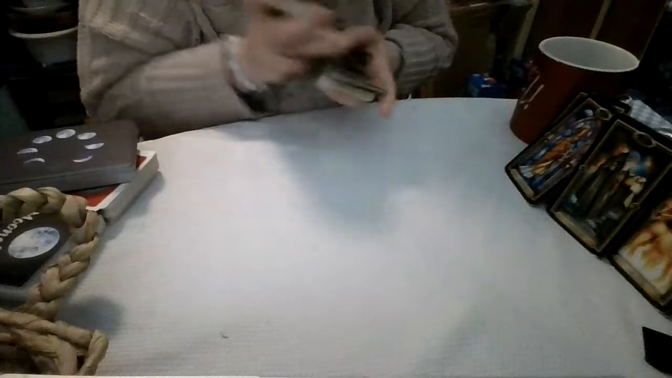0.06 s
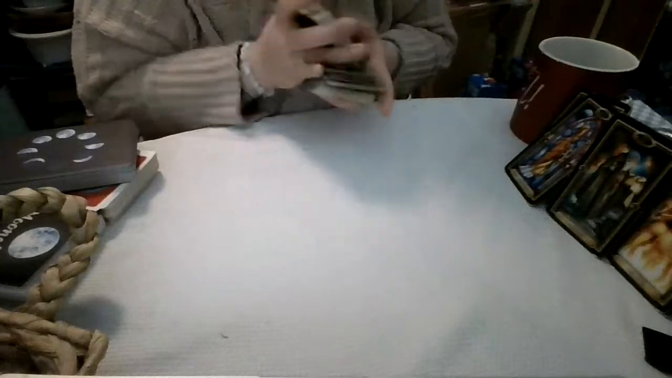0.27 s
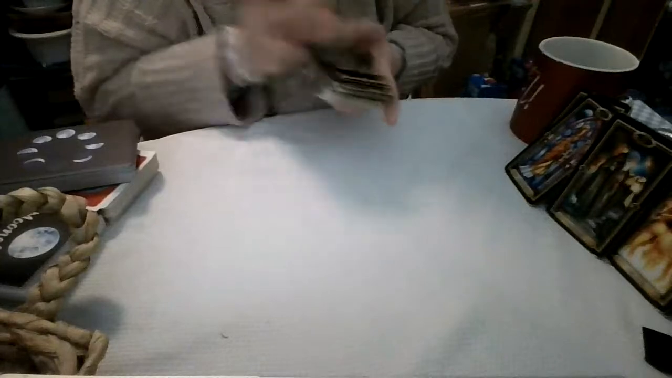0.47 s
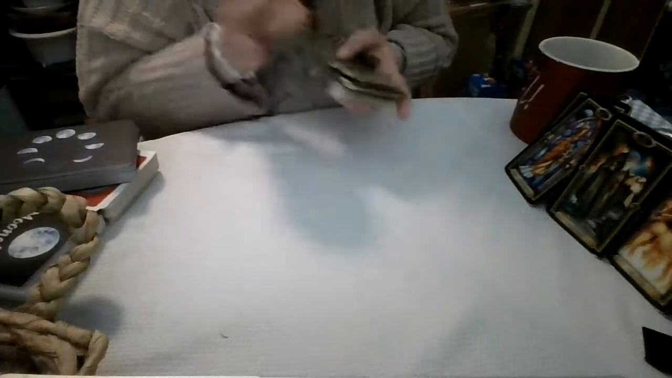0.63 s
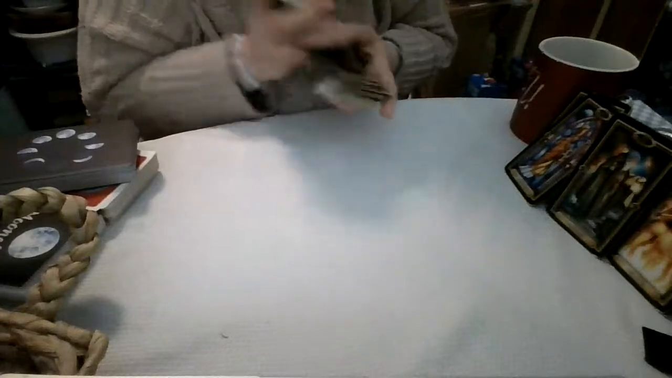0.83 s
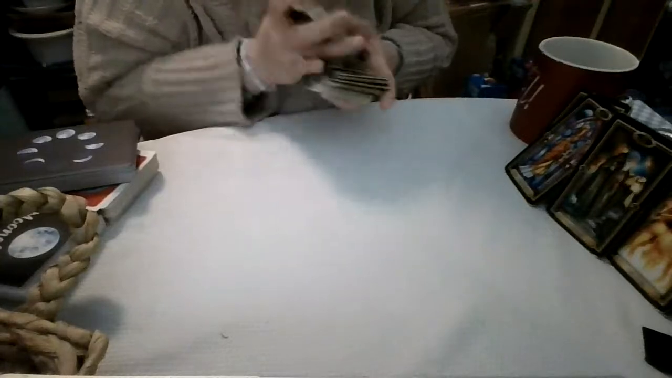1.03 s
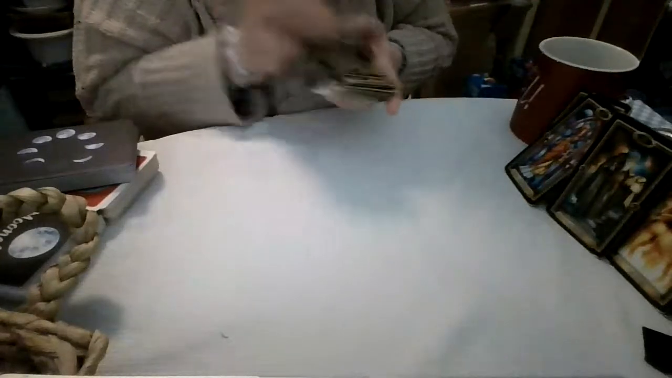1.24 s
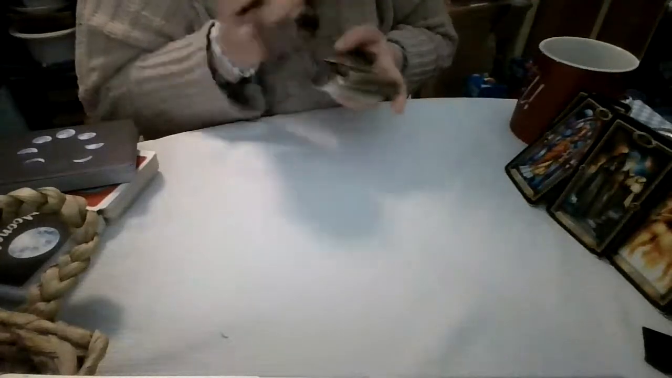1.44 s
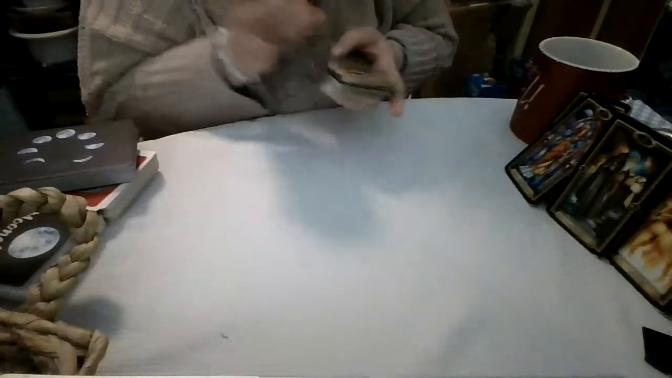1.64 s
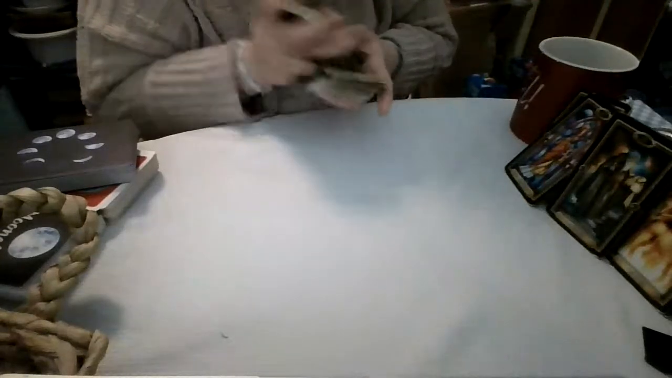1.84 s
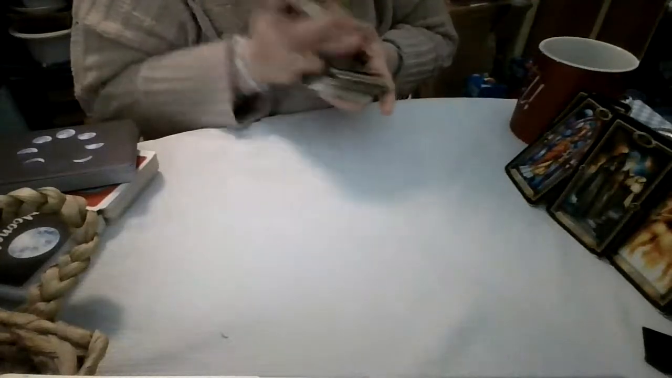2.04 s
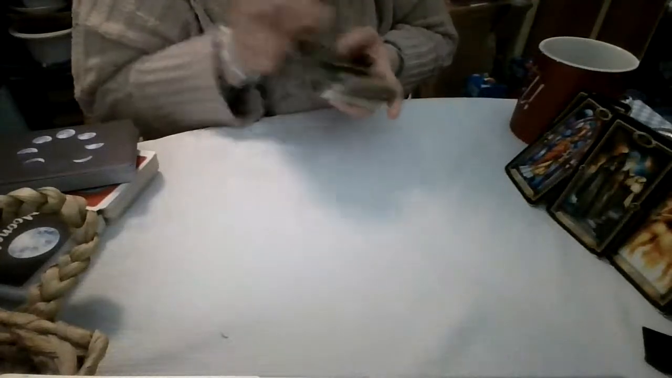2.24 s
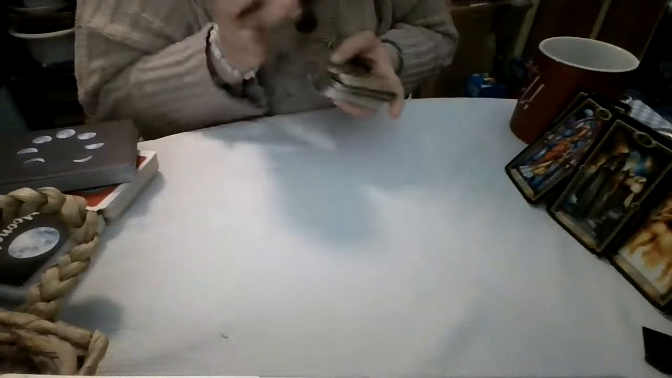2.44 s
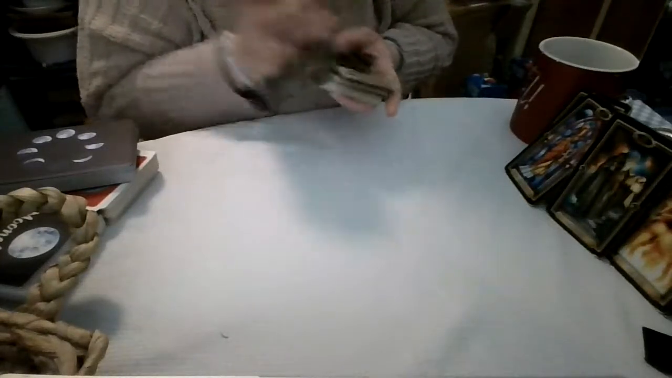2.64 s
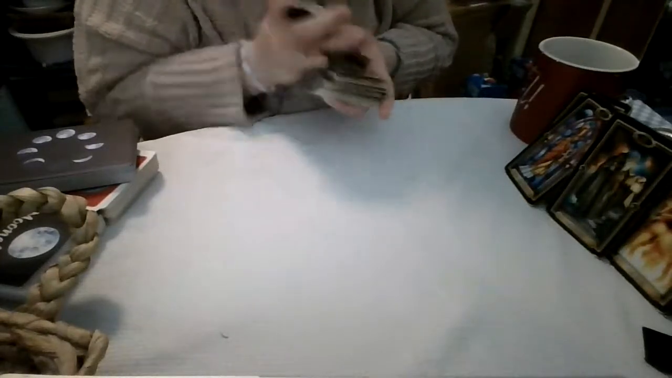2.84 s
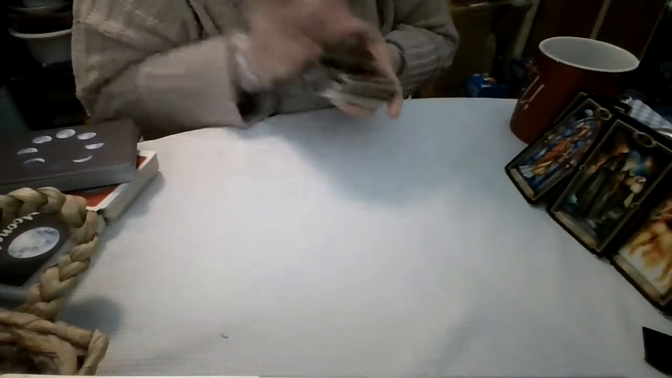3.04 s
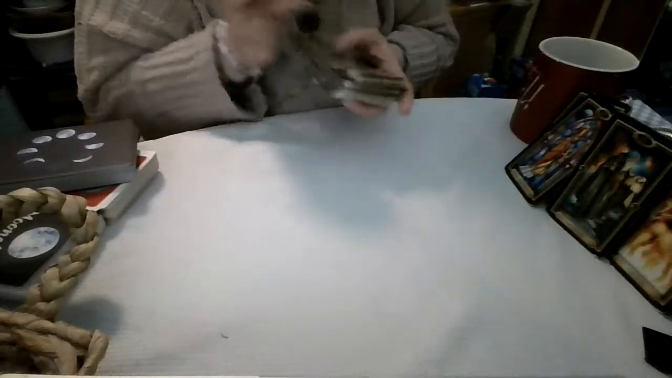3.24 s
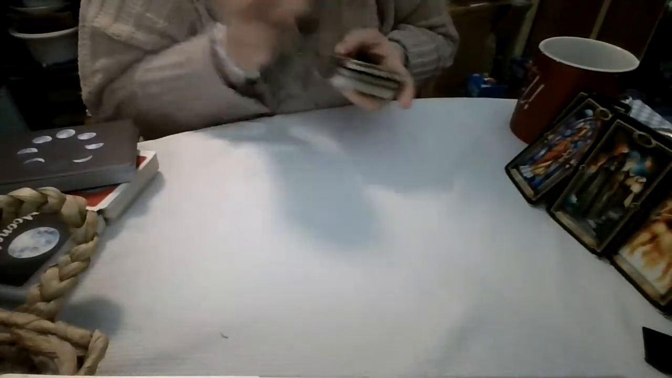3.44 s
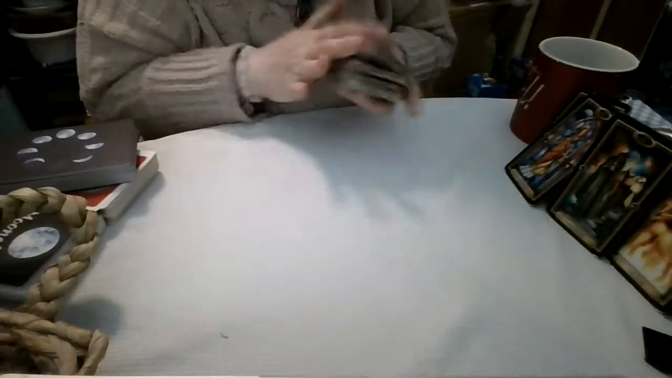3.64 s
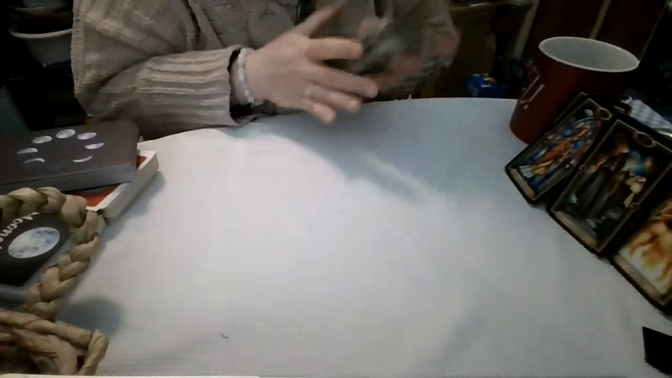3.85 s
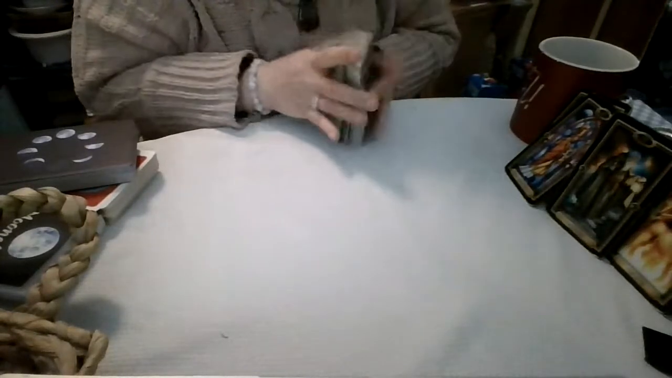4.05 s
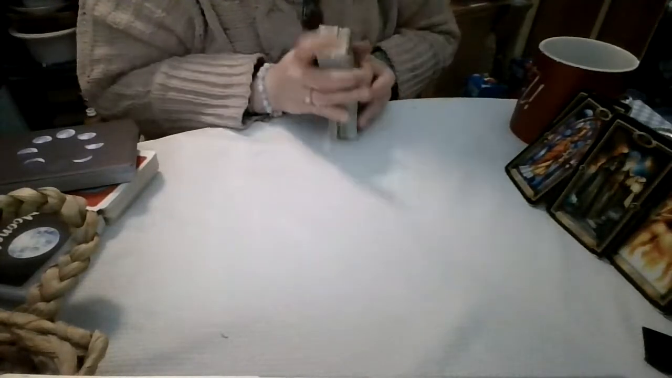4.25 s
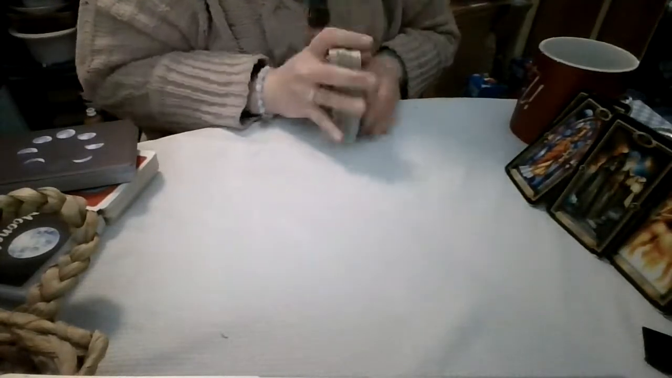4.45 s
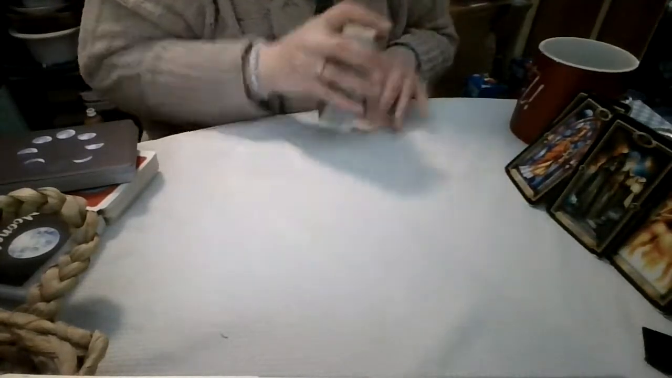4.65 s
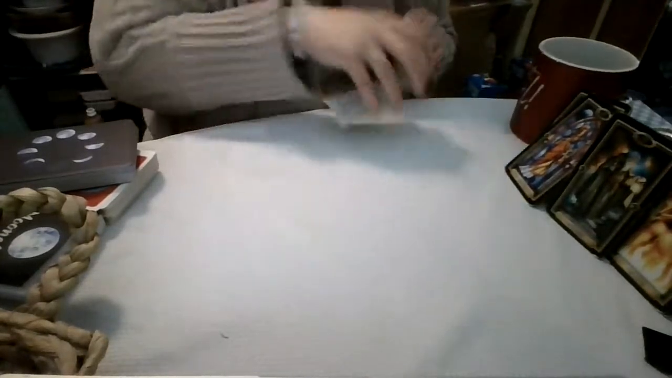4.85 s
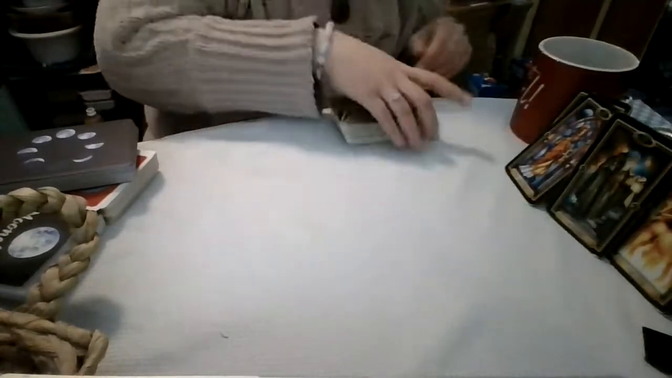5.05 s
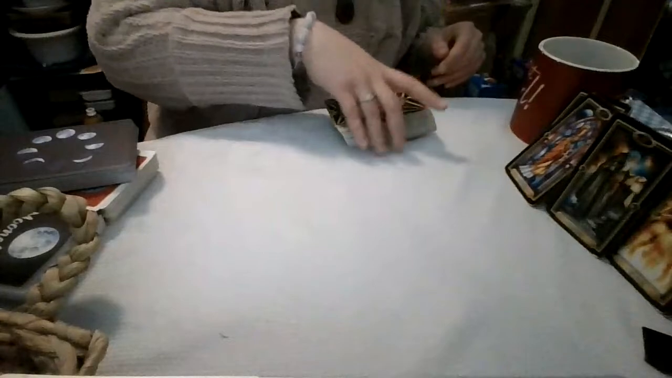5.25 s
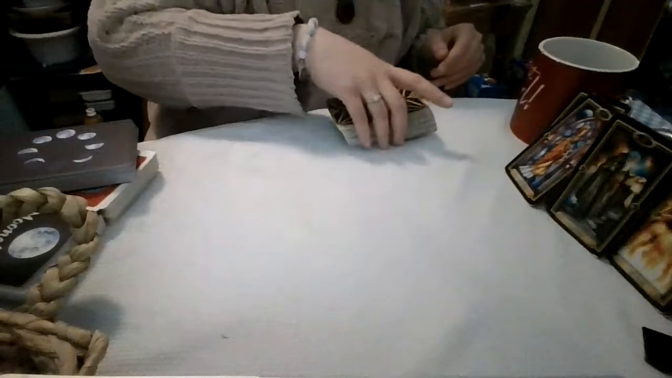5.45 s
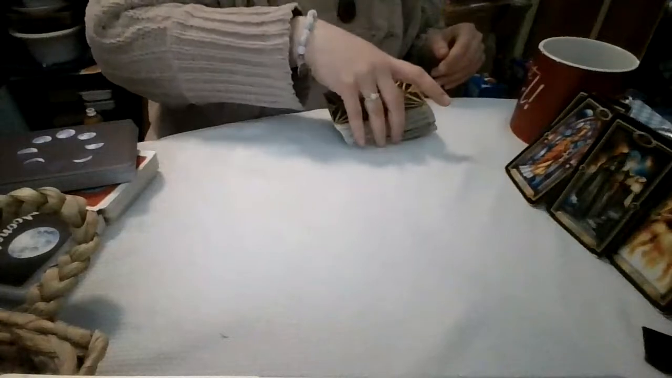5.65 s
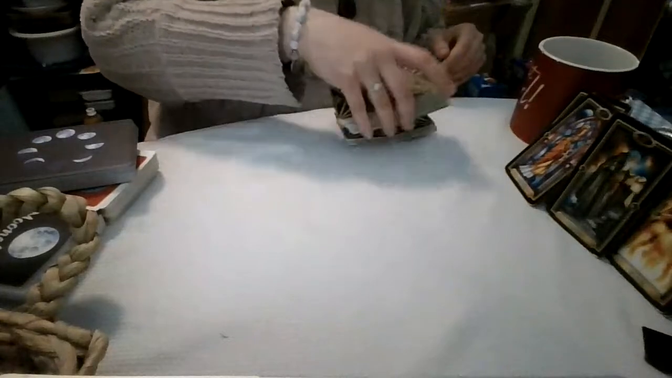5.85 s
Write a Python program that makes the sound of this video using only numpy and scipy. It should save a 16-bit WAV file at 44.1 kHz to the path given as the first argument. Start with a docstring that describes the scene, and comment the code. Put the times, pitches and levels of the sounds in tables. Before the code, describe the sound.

A steady overhand card shuffle with a lightly clicking bracelet ends in two knocks of the deck and a soft set-down.

```python
"""A humming room, close to a cloth-covered table. In an overhand shuffle, packets of cards swish off the
deck and slap into the other palm four times a second, while a bead bracelet ticks on the wrist. The deck
is then knocked square twice and laid down, ringing the table top and thudding in the cloth. Under it all
the room rumbles and the microphone hisses; cards and beads are bright in the high treble."""
import sys
import numpy as np
from scipy import signal
from scipy.fft import rfft, irfft, next_fast_len
from scipy.io import wavfile
from scipy.ndimage import map_coordinates

SR = 44100
rng = np.random.default_rng(int(sys.argv[2]) if len(sys.argv) > 2 else 0)


def digitize_waveform(pressure):
    """Quantize a signal to 16-bit integers and store it at the path in sys.argv[1].

    Rows of a 2-D input are taken as channels; values are limited to [-1, 1].
    """
    field = np.atleast_2d(pressure).T
    bounded = np.clip(field, -1, 1)
    quanta = np.round(bounded * 32767).astype(np.int16)
    wavfile.write(sys.argv[1], SR, quanta)


N = 260190

# Noise colours of the bed. Each row: frequency in Hz, relative level in dB.
HUM_COLOUR = [(20, -34), (34, 1), (43, -13.5), (123, -12), (145, -11.5), (178, -11), (201, -22.5),
              (232, -20), (263, -28.5), (342, -21), (387, -24.5), (515, -23), (932, -28), (1080, -22.5),
              (4500, -44.5), (5850, -82), (9900, -120)]  # room rumble
SWAY_COLOUR = [(1, -6), (5, 0), (10, -3), (16, 1), (19, -1), (23, -12), (40, -40), (100, -130)]  # slow air pressure
MIC_HISS_COLOUR = [(2060, -40), (3500, -10), (3930, -18), (4220, -8), (7480, -7.5), (7880, -7.5),
                   (14700, -7.5), (16500, -23)]
# Stereo image of the rumble. Each row: frequency in Hz, left-right likeness from -1 to 1.
HUM_LIKENESS = [(60, 1), (180, 1), (550, 0.87), (1650, 0.68), (3100, -0.64), (4500, -0.8)]
# Fuzzy steady tones in the room. Each row: pitch in Hz, nominal width in Hz, level in dB.
ROOM_DRONES = [(175.2, 22.7, -52.5), (240.5, 20, -58.5), (115.2, 11, -61.5), (66.3, 7.6, -50.5),
               (31.4, 10.6, -46)]
# Echo off table and walls. Each row: frequency in Hz, time to fall 60 dB in seconds.
ROOM_DECAY = [(200, 0.2), (1400, 0.16), (4000, 0.18), (12000, 0.11)]

# Level ride of loose cards sliding on cards. Each row: time in seconds, relative hiss level in dB.
SLIDE_RIDE = [(0, -51), (.2, -69.5), (.5, -58.5), (1.2, -69), (1.75, -60), (2.4, -61), (3.1, -57),
              (3.45, -59), (3.65, -64), (4.1, -60.5), (4.7, -68.5), (5.9, -73)]
# Cards brushing each other or the cloth. Each row: peak time in seconds, relative swish level in dB,
# rustle over swish in dB, swell time in seconds.
CARD_BRUSHES = [(0.157, -38, -4, 0.021), (.31, -60, -5, 0.013), (.413, -42, -6, 0.042), (.54, -72, -6, .02),
                (.676, -38, -5.5, 0.022), (0.946, -41, -6, 0.029), (1.14, -61, -7, 0.014),
                (1.196, -36, -4.5, 0.02), (1.4, -48, -5, 0.042), (1.458, -36, -5, 0.012),
                (1.63, -46.5, -10, 0.025), (1.695, -42, -5, 0.015), (1.91, -60.5, 8, 0.015),
                (1.962, -42, -9, 0.031), (2.225, -38.5, -1.5, 0.025), (2.445, -41.5, -10, 0.022),
                (2.469, -34, 0.5, 0.012), (2.73, -34, -3, 0.018), (2.955, -43, -9, 0.0083),
                (2.982, -38.5, -0.5, .012), (3.2, -64, -12, 0.028), (3.248, -42, 1.5, 0.03),
                (3.44, -59, -12, 0.041), (3.501, -34, -10.5, .021), (3.674, -36, 0.5, .012),
                (3.88, -53, -12, 0.013), (3.95, -52, -19, 0.011), (4.098, -42, -13, 0.0086),
                (4.165, -52, -10, 0.024), (4.25, -64, -10, .02), (4.495, -45, 7.5, .0097),
                (4.54, -48, -9, 0.012), (4.635, -61, -6, 0.023), (5.011, -50, -4, 0.015),
                (5.08, -58.5, -10, .01), (5.63, -63, -12, 0.017)]
# The clearer bead touches. Each row: start in seconds, relative tick level in dB, then lower and upper
# ring over the tick in dB.
BEAD_TICKS = [(0.0797, -46, -25, -25), (0.1008, -26.5, -14, -18), (0.2465, -33, -17, -10),
              (0.2534, -38, -30, -20), (0.2886, -54, -25, -25), (0.3068, -41, -20, -3),
              (0.3585, -39.5, -20, -20), (0.512, -27.5, -7.5, -20), (0.563, -46, -25, -10),
              (0.7586, -45, -22, -23), (0.784, -39, -14, -14), (0.8479, -32, -25, -22),
              (0.8883, -45, -17, -15), (1.0205, -45, -31, -25), (1.054, -43.5, -27, -18),
              (1.0988, -40, -25, -25), (1.1477, -40, -12, -14), (1.255, -32, -11, -25),
              (1.355, -33.5, -16, -22), (1.5375, -37.5, -10.5, -15), (1.593, -40, -25, -25),
              (1.795, -33.5, -8, -20), (1.8024, -36, -18, -20), (1.8455, -33, -25, -25),
              (1.872, -47, -25, -25), (2.044, -44, -25, -25), (2.0895, -41, -20, -20),
              (2.1325, -47, -25, -25), (2.2482, -41.5, -20, -20), (2.315, -40.5, -28, -25),
              (2.3535, -41, -12, 3), (2.398, -44, -25, -25), (2.423, -25.5, -10, -20),
              (2.572, -31.5, -21, -11), (2.6794, -27, -14, -16), (2.8185, -31, -14, -1),
              (2.8892, -39, -21, -21), (2.9092, -49, -20, -20), (2.9245, -29.5, -10, -18),
              (3.043, -40, -14, -20), (3.0663, -41, -15, 0), (3.103, -42, -25, -25),
              (3.1789, -28.5, -17, -18), (3.3092, -31.5, -10, -18), (3.4271, -26, -14, -18),
              (3.5585, -41, -6, -20), (3.508, -33, -25, -25), (3.58, -41, -25, -25),
              (3.642, -46.5, -20, -20), (3.8361, -43.5, -13, -20), (3.9222, -34.5, -4, -20),
              (3.935, -36, -25, -25), (4.487, -46.5, -25, -20), (4.535, -50, -10, -20),
              (4.96, -53, -25.5, -5.5), (5.0385, -45, -25, -20)]
# The two notes of the beads. Each row: pitch in Hz, nominal decay in seconds.
BEAD_MODES = [(10150, 0.027), (13300, 0.044)]
# Packets landing, often a leading edge first. Each row: start in seconds, relative levels of clack,
# edge snap and palm thud in dB, clack pitch in Hz, thud pitch in Hz.
PACKET_LANDINGS = [(0.1535, -27, -42, -33, 1300, 590), (0.407, -23, -34.5, -63, 1280, 550),
                   (0.413, -21, -17.5, -23.5, 1130, 555), (0.6405, -33, -46, -43, 920, 580),
                   (0.6696, -23.5, -34.5, -31.5, 1400, 854), (0.6756, -20.5, -17, -31, 1190, 580),
                   (0.91, -29, -45, -39, 1330, 533), (0.9401, -28.5, -40, -33.5, 1290, 407),
                   (0.951, -28, -40, -36.5, 1320, 447), (1.189, -24, -41, -37, 1390, 541),
                   (1.1956, -16.5, -22.5, -35, 1215, 530), (1.4572, -22.5, -22, -28.5, 1770, 465),
                   (1.6892, -15.5, -26.5, -32, 1360, 350), (1.6953, -15, -11.5, -23, 2190, 592),
                   (1.9366, -32, -40.5, -50, 1760, 447), (1.9578, -22, -40, -35, 1190, 555),
                   (1.962, -16, -24.5, -32, 1220, 570), (1.9647, -17.5, -16, -34, 1890, 557),
                   (2.1672, -32, -36, -44, 1940, 433), (2.1785, -37, -28.5, -39, 1500, 450),
                   (2.2181, -24.5, -38, -30.5, 1260, 457), (2.4347, -19.5, -34, -32, 1270, 560),
                   (2.4613, -19, -33, -29, 1360, 604), (2.4686, -19.5, -20, -29, 1200, 345),
                   (2.491, -28, -49, -52, 1090, 592), (2.7228, -24, -39, -25, 1300, 536),
                   (2.7287, -17.5, -21, -30.5, 2040, 617), (2.753, -26, -45, -40, 1220, 557),
                   (2.946, -34, -36, -39, 1420, 437), (2.9488, -33, -49, -49, 1500, 450),
                   (2.9767, -33, -40, -32, 1380, 410), (2.9809, -24, -46, -31.5, 1340, 425),
                   (3.011, -26, -78, -35, 1220, 550), (3.2429, -26.5, -39, -31.5, 1680, 580),
                   (3.2761, -25, -57, -36, 1100, 543), (3.4545, -31.5, -41, -57, 1190, 503),
                   (3.5003, -17.5, -28, -26.5, 1194, 450), (3.5246, -26, -35, -32, 1300, 507),
                   (3.658, -33, -45, -36, 2000, 410), (3.679, -16, -27, -39, 1430, 650),
                   (3.7359, -35, -37.5, -48, 1400, 500)]
# The cards sit off to one side. Each row: frequency in Hz, phase lead of left over right in radians.
CARD_PHASE_LEAD = [(500, 0), (1200, .5), (1980, .8), (3270, 2.3), (4650, 5.8), (14000, 5.8)]
# The deck meeting the table. Each row: start in seconds, ring level in dB, contact time in seconds,
# thud level in dB, nominal thud decay in seconds, jolt level in dB.
DECK_KNOCKS = [(4.0896, -10.5, 0.00019, -26.5, 0.17, -16.5), (4.4985, -1, 0.00038, -9.5, 0.11, -22.5),
               (4.999, -26, 0.00076, -44, 0.28, -17.5)]
# Modes of the table top. Each row: pitch in Hz, relative levels in dB for the first knock, the second
# knock and the lay-down, time to fall 60 dB in seconds.
TABLE_MODES = [(133, -4, -24, 7, 0.042), (240, -5.5, -25, -1.5, 0.079), (302, 2.5, -4.5, -2, 0.038),
               (382, 3, -32, -14, 0.021), (512.5, -6, -30, -23, 0.12), (545, -6.5, -5.5, -1.5, 0.097),
               (615, -8, -9, -4, 0.08), (634.4, 0.5, 7, -16, 0.053), (774, -13, -11, -9, 0.043),
               (952, 6, 6.5, -1, 0.039), (1180, 3, -15, -13, 0.043), (1277, -2, -4, -14, 0.086),
               (1348, -13, -5.5, -13, 0.15), (1890, -22, -17, -20, 0.031), (1950, -10, -3, -9, 0.043),
               (2654, -27, 4, -24, 0.054), (3400, -30, -24, -30, .025), (4300, -36, -29, -30, .02)]

# Noise colours of the foley. Each row: frequency in Hz, relative level in dB.
RUB_COLOUR = [(2940, -39), (5000, -10), (7530, -8), (11600, 3), (14100, 7), (15900, 1), (16300, -8.5),
              (16500, -18)]  # bright hiss of card faces
RUSTLE_COLOUR = [(100, -67.5), (250, -30), (500, -1), (1100, 5.5), (2000, 2), (3500, -4), (6000, -17.5),
                 (9000, -39), (14000, -77)]  # their duller rustle
BEAD_COLOUR = [(1760, -54), (3000, -20), (5700, -18), (7060, -10), (9190, -7.5), (9940, -1.5), (13200, 9.5),
               (15300, 1), (16500, -3)]  # bead on bead
SNAP_COLOUR = [(1470, -16), (2500, -3), (3190, -6), (4590, -8.5), (5250, -9), (8170, -9.5), (9350, -11.5),
               (12600, 1), (16000, -10.5), (16500, -9.5)]  # card edges landing
FLUTTER_COLOUR = [(500, -53.5), (1000, -38), (1500, 3), (2200, 5.5), (3200, -8.5), (5000, -11.5),
                  (9000, -68)]  # a packet bending
PALM_AIR_COLOUR = [(60, -74), (120, -4), (230, -3.5), (400, -3), (700, -11), (1200, -10), (3000, -91)]  # air pressed out of the palm
CLOTH_COLOUR = [(120, 1.5), (300, -10.5), (600, -0.5), (1300, -6.5), (1600, -13), (2700, -20.5),
                (4500, -39), (9000, -78)]  # the deck thudding in the cloth


def amp(db):
    """Decibels to gain."""
    return 10 ** (np.asarray(db) / 20)


def unit(x):
    """x at rms 1."""
    return x / np.sqrt(np.mean(x ** 2) + 1e-20)


def along(points, hz):
    """Read a curve of (Hz, value) points on a log frequency axis."""
    freqs, values = np.transpose(points)
    return np.interp(np.log(hz + 1), np.log(freqs + 1), values)


def colour(points):
    """An EQ curve through (Hz, dB) points."""
    return lambda hz: amp(along(points, hz))


def filtered(x, response):
    """x through a complex frequency response."""
    size = next_fast_len(N + SR // 2)
    return irfft(rfft(x, size) * response(np.fft.rfftfreq(size, 1 / SR)), size)[..., :N]


def wobble(rate):
    """A smooth random curve, rate knots a second."""
    return map_coordinates(rng.standard_normal(int(N * rate / SR) + 4), [np.arange(N) * rate / SR])


def noise(eq, likeness):
    """Stereo noise of rms 1, coloured by eq, its width set by (Hz, left-right likeness) points."""
    def mid_side(hz):
        angle = np.arccos(np.clip(along(likeness, hz), -1, 1)) / 2
        return eq(hz) * [np.cos(angle), np.sin(angle)]
    mid, side = filtered(rng.standard_normal((2, N)), mid_side)
    return unit(np.array([mid + side, mid - side]))


def bursts(starts, peaks_db, rise_s, decay_s, left_db=0):
    """Stereo envelope of hits, each falling 60 dB in decay_s plus six rise times."""
    out, t = np.zeros((2, N + SR)), np.arange(SR // 4) / SR
    shape = (1 - np.exp(-t / rise_s)) ** 2 * amp(-60 * t / (decay_s + 6 * rise_s))
    panned = amp([[left_db / 2], [-left_db / 2]]) * shape / shape.max()
    for start, db in zip(starts, peaks_db):
        out[:, round(start * SR):][:, :len(t)] += amp(db) * panned
    return out[:, :N]


def room(x, wet_db):
    """The direct sound and its echo off table and walls; a new tail for each quarter second."""
    out = np.pad(x, ((0, 0), (0, SR)))
    step, predelay = SR // 4, 130  # samples
    for start in range(0, N, step):
        hz, t, (mid, side) = signal.stft(rng.standard_normal((2, SR // 3)), SR, nperseg=128)
        width = np.clip(hz / 2600, .12, 1)[:, None]  # long waves reach both sides alike
        wash = np.array([mid + width * side, mid - width * side]) / np.hypot(1, width)
        decay = amp(-60 * t / along(ROOM_DECAY, hz)[:, None])
        tail = signal.istft(wash * decay, SR, nperseg=128)[1]
        echo = signal.fftconvolve(x[:, start:start + step], tail / np.linalg.norm(tail[0]), axes=1)
        out[:, start + predelay:][:, :echo.shape[1]] += amp(wet_db) * echo
    return out[:, :N]


def off_axis(x, lead):
    """Sound from one side reaches the two microphone ports out of step."""
    return filtered(x, lambda hz: np.exp(.5j * along(lead, hz) * np.array([[1], [-1]])))


def two_bandpasses(centre_hz, width_hz):
    """An EQ curve of two like resonances in series."""
    return lambda hz: (1j * hz * width_hz / (centre_hz ** 2 - hz ** 2 + 1j * hz * width_hz)) ** 2


def room_tone():
    """The bed: unsteady rumble, fuzzy drones, slow air pressure and the microphone's own hiss."""
    rumble = amp(-44.5 + .6 * wobble(5)) * noise(colour(HUM_COLOUR), HUM_LIKENESS)
    drones = sum(amp(db) * noise(two_bandpasses(hz, 1.36 * width), [(200, 0.95)])
                 for hz, width, db in ROOM_DRONES)
    sway = amp(-36) * noise(colour(SWAY_COLOUR), [(10, .97)])
    hiss = amp(-67) * noise(colour(MIC_HISS_COLOUR), [(9000, 0.026)])
    return rumble + drones + sway + hiss


def card_slides():
    """Card faces rub: a grainy hiss and a duller rustle, left of centre, swelling at each brush."""
    t, release_s = np.arange(N) / SR, 0.013
    grip = wobble(78)  # roughens both layers together
    hiss_db = np.interp(t, *np.transpose(SLIDE_RIDE)) + 1.5 * wobble(6.2)
    hiss_level = amp(hiss_db)
    rustle_level = amp(-59.5 + 0.24 * (hiss_db + 61.5))  # loosely follows the hiss
    for peak_s, db, rustle_db, swell_s in CARD_BRUSHES:
        swell = amp(db) * np.exp(-np.abs(t - peak_s) / np.where(t < peak_s, swell_s, release_s))
        hiss_level += swell
        rustle_level += amp(rustle_db) * swell
    hiss = amp(2.2 * grip + 2.8 * wobble(500)) * noise(colour(RUB_COLOUR), [(9000, .7)])
    rustle = amp(2.2 * grip + 1.5 * wobble(200)) * noise(colour(RUSTLE_COLOUR), [(2000, .7)])
    return hiss_level * hiss * amp([[2.1], [-2.1]]) + rustle_level * rustle * amp([[.6], [-.6]])


def bracelet():
    """Beads on the left rattle briefly and ring on; faint chance touches fall during the shuffle."""
    t = np.arange(N) / SR
    shuffle_end_s, left_db = 3.95, 8.5
    faint = [(rng.uniform(0, shuffle_end_s), rng.uniform(-52, -47), -20, -20) for _ in range(14)]
    starts, tick_db, *rings_db = np.vstack([BEAD_TICKS, faint]).T
    grain = amp(3.5 * wobble(900))  # a touch is several tiny contacts
    rattle = unit(grain * noise(colour(BEAD_COLOUR), [(9000, 0.14)]))
    ticks = rattle * bursts(starts, tick_db, rise_s=0.00012, decay_s=0.013, left_db=left_db)
    ring = np.zeros((2, N))
    for ring_db, (hz, decay_s) in zip(rings_db, BEAD_MODES):
        envelope = bursts(starts, tick_db + ring_db, rise_s=0.00082, decay_s=decay_s, left_db=left_db)
        shimmer = amp(3.4 * wobble(120))
        ring += envelope * shimmer * np.sin(2 * np.pi * hz * t + 2.1 * wobble(60))
    return room(ticks + .5 * ring, wet_db=-7) + .5 * ring  # half the ring stays dry


def ping(t, hz, db, rise_s, t60):
    """A struck, dying sine at a random phase."""
    envelope = amp(db - 60 * t / t60) * (1 - np.exp(-t / rise_s))
    return envelope * np.sin(2 * np.pi * hz * t + rng.uniform(0, 2 * np.pi))


def packet_slaps():
    """Each packet snaps at its edges, clacks and flutters as it bends, and thuds into the hollow palm."""
    starts, clack_db, snap_db, palm_db, clack_hz, thud_hz = np.transpose(PACKET_LANDINGS)
    grain = amp(3.5 * wobble(700))  # the cards land edge by edge
    snap = unit(grain * noise(colour(SNAP_COLOUR), [(3000, 0.49)]))
    snap *= bursts(starts, snap_db + 4, rise_s=0.00015, decay_s=0.012, left_db=7)
    flutter = noise(colour(FLUTTER_COLOUR), [(1000, 0.49)])
    flutter *= bursts(starts, clack_db - 15, rise_s=0.00087, decay_s=0.034)
    puff = noise(colour(PALM_AIR_COLOUR), [(300, 1.0)])
    puff *= bursts(starts, palm_db - 6.5, rise_s=0.00183, decay_s=0.035)
    body, t = np.zeros(N + SR), np.arange(SR // 8) / SR
    for i, start in enumerate(starts):
        clack = ping(t, clack_hz[i], clack_db[i] + 2, rise_s=0.00074, t60=0.014)
        thud = ping(t, thud_hz[i], palm_db[i] + 4.5, rise_s=0.0015, t60=0.035)
        body[round(start * SR):][:len(t)] += clack + thud
    return room(snap, wet_db=-9) + room(flutter + puff + body[:N], wet_db=-9.5)


def deck_knocks():
    """The deck rings the table top and thuds in the cloth; a deep jolt also reaches the microphone."""
    table, t = np.zeros(N + SR), np.arange(SR // 2) / SR
    thud_level = np.zeros((2, N))
    jolt = np.sin(2 * np.pi * 32 * t) * (1 - np.exp(-t / 0.0096)) * amp(-60 * t / 0.19)
    for spot, (start, ring_db, contact_s, thud_db, thud_s, jolt_db) in enumerate(DECK_KNOCKS):
        ring = np.zeros(len(t))
        for hz, *spot_db, t60 in TABLE_MODES:
            phase = rng.uniform(-0.72, 2.17)
            ring += amp(spot_db[spot] - 60 * t / t60) * np.sin(2 * np.pi * hz * t + phase)
        force = t * np.exp(-t / contact_s)  # longer contact, duller knock
        bloom = 1 - np.exp(-t / 0.0053)
        knock = signal.fftconvolve(force, ring * bloom)[:len(t)]
        knock /= np.abs(knock).max()
        table[round(start * SR):][:len(t)] += amp(ring_db) * knock + amp(jolt_db) * jolt
        thud_level += bursts([start], [thud_db], rise_s=0.0012, decay_s=thud_s)
    thud = thud_level * noise(colour(CLOTH_COLOUR), [(600, 0.84), (3000, 0.13)])
    return room(table[:N] * amp([[-.3], [.3]]) + thud, wet_db=-13)


def scene():
    """The mix: cards, wrist and table over the room tone."""
    cards = off_axis(packet_slaps() + card_slides(), CARD_PHASE_LEAD)
    return cards + bracelet() + deck_knocks() + room_tone()


def record(dry):
    """Peaks round off; the very top steps down 22 dB, then cuts out at the band limit."""
    step_hz, limit_hz = 15850, 16974
    rounded = dry / (1 + np.abs(dry) ** 8) ** (1 / 8)
    return filtered(rounded, lambda hz: amp(-22 * (hz > step_hz)) * (hz < limit_hz))


dry = scene()
out = record(dry)
digitize_waveform(out)
```